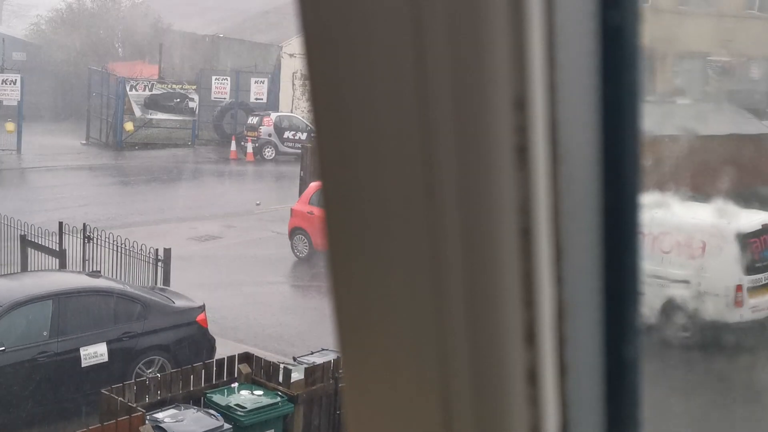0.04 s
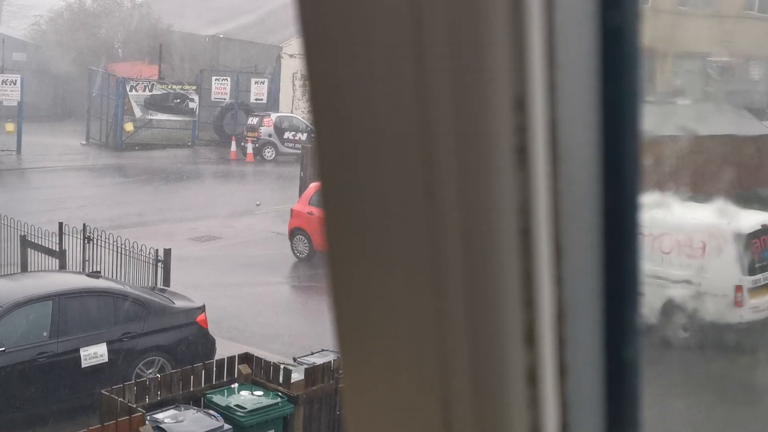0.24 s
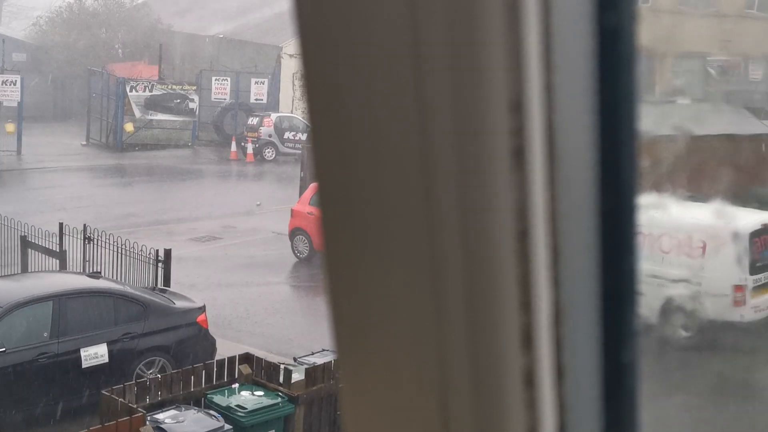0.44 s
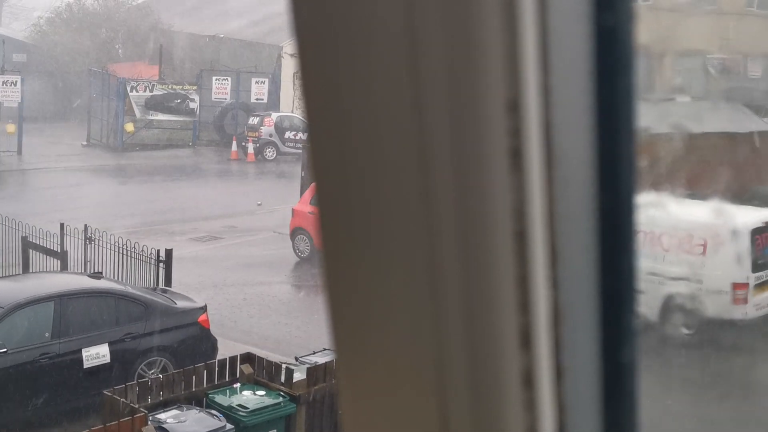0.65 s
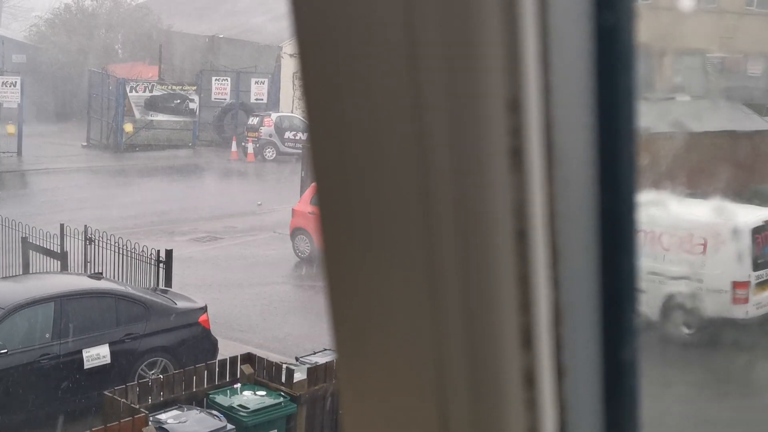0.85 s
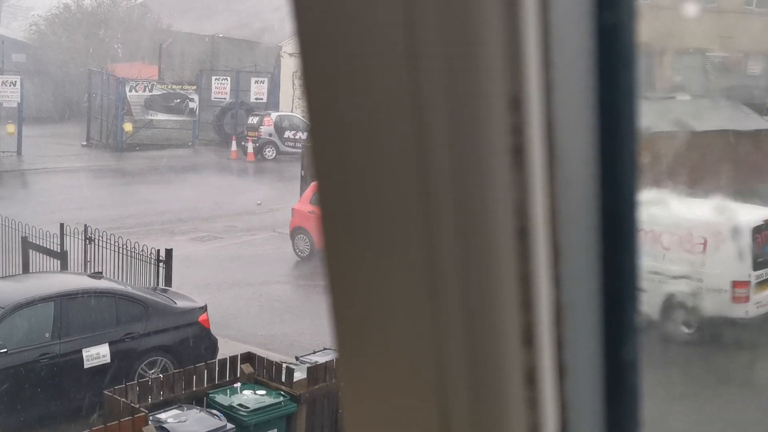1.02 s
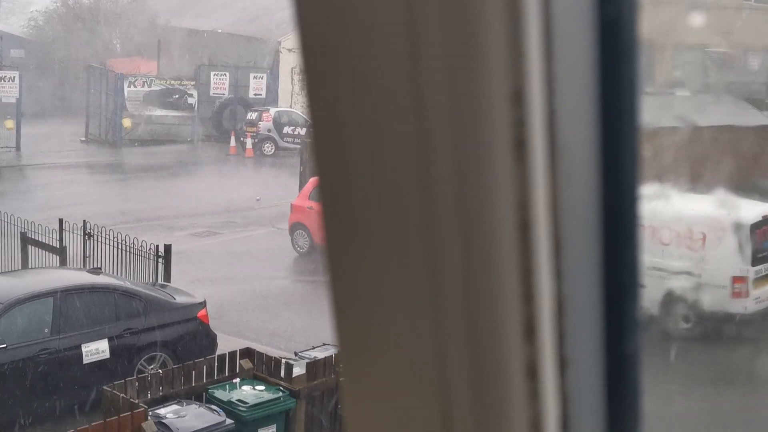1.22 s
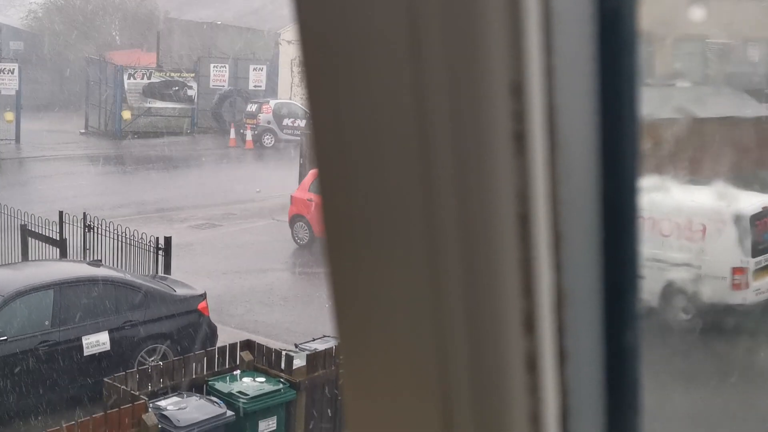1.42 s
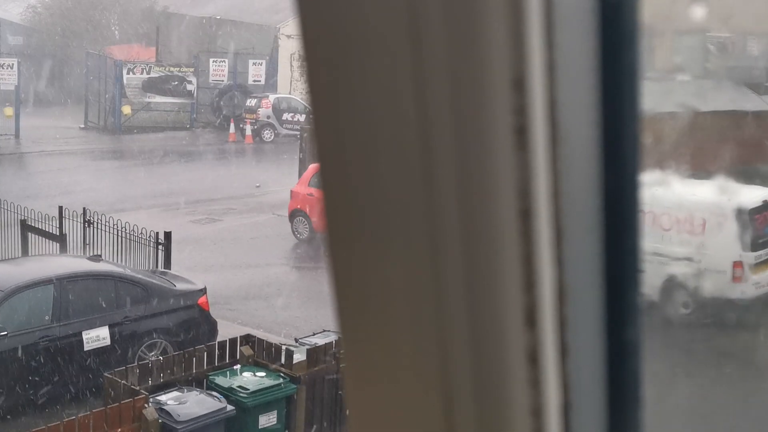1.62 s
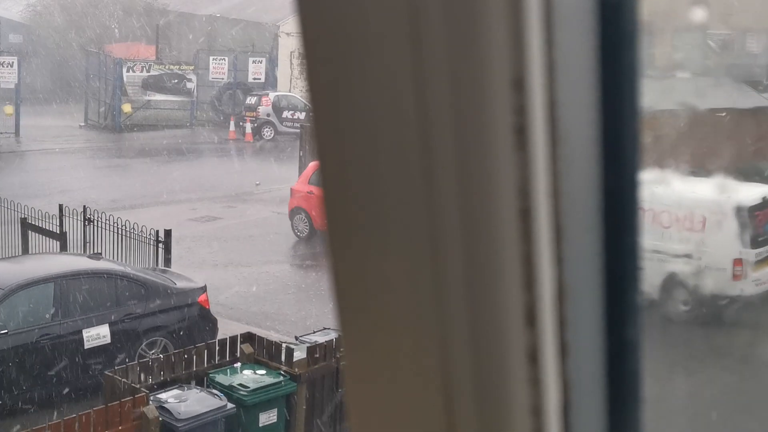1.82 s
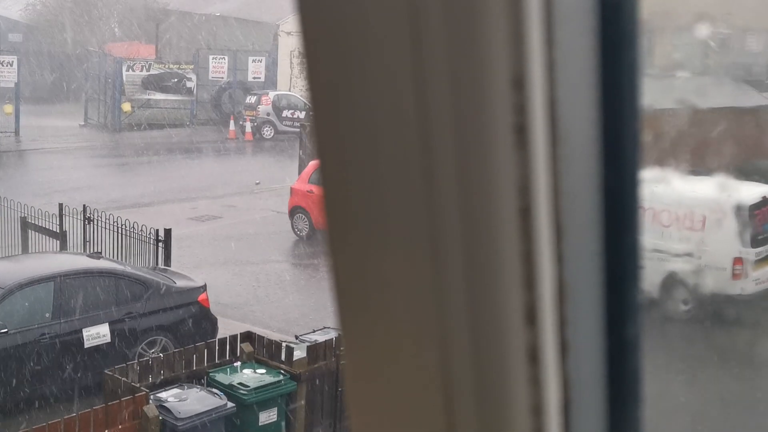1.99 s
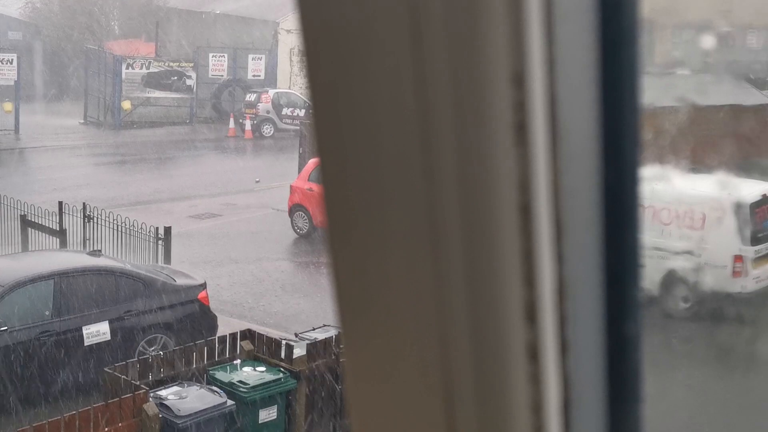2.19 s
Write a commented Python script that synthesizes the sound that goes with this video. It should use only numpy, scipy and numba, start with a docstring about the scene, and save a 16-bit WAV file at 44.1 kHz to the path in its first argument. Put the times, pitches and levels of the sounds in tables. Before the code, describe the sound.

Heavy rain outside a window, with low wind rumble and a few close drips.

```python
"""Heavy wind-driven rain on a street, heard through a slightly open window: countless drop impacts
over a smooth hiss, with a low boom of air in the gap. A gust buffets the phone's left microphone
port with spikes of pressure, so its gain control ducks the rain. As the gust dies, a sheet of rain
splatters on something hard to the right, and a few drops tick close by."""
import sys
import numpy as np
from scipy import signal
from scipy.fft import rfft, irfft
from scipy.io import wavfile
from numba import njit

SR = 44100
rng = np.random.default_rng(int(sys.argv[2]) if len(sys.argv) > 2 else 0)


def wrap_up_sound(samples):
    """Save the sound to the file named by the first command line argument, as 16-bit audio."""
    columns = np.atleast_2d(samples).T
    # keep every value between -1 and 1, then stretch to whole-number steps
    tamed = np.clip(columns, -1, 1)
    steps = np.round(tamed * 32767).astype(np.int16)
    wavfile.write(sys.argv[1], SR, steps)


N = 103635
TIME = np.arange(N) / SR
FREQS = np.arange(N // 2 + 1) * SR / N


def undb(db):
    """Decibels to gain."""
    return 10 ** (np.asarray(db) / 20)


def unit(x):
    """Scale to rms 1."""
    return x / np.sqrt(np.mean(x ** 2))


def fader(points):
    """Gain over time from (t/s, level/dB) points."""
    return undb(np.interp(TIME, *np.array(points).T))


def over_bins(points, column=1):
    """One column of a table, joined on a log-frequency axis."""
    points = np.array(points, float)
    return np.interp(np.log(np.maximum(FREQS, 1)), np.log(points[:, 0]), points[:, column])


def colour(x, points):
    """Equalise by (f/Hz, level/dB) points."""
    return irfft(rfft(x) * undb(over_bins(points)), N)


def wander(hz):
    """Slow random modulation with rms 1."""
    return unit(irfft(rfft(rng.standard_normal(N)) * np.exp(-(FREQS / hz) ** 2), N))


def gap_boom():
    """Wind across the window gap stirs a broad low resonance that swells and sinks, dead centre."""
    # swell of the boom: t/s, level/dB
    swell = [(0, -58), (.6, -55), (1.15, -50.5), (1.34, -51), (1.45, -46), (1.6, -47.5), (1.75, -48),
             (1.88, -53.5), (2.05, -46), (2.15, -51.5), (2.32, -50.5)]
    # resonance of the gap: f/Hz, relative level/dB
    resonance = [(80, -42), (135, -11.5), (172, -0.5), (205, 4), (240, -8), (300, -8), (380, -30),
                 (800, -53)]
    return unit(colour(rng.standard_normal(N), resonance)) * fader(swell)


def near_drips():
    """Drops land close by, each a bright tick that dies in a few milliseconds."""
    # landings: t/s, level before EQ/dB, treble shelf/dB
    landings = [(1.463, -47, 13), (1.9464, -34.5, 2), (2.0865, -43, 12), (2.154, -39.5, -10)]
    # EQ of a tick: f/Hz, level/dB
    tick_eq = [(2000, -17.5), (4500, -14), (5600, -6), (7600, 5), (9000, -23), (15000, -23)]
    decay_s, right_db = .0022, -3
    out = np.zeros((2, N))
    for at, db, shelf_db in landings:
        envelope = 2 * undb(db) * (TIME >= at) * np.exp(-np.abs(TIME - at) / decay_s)
        for side, side_db in enumerate((0, right_db)):
            tick = colour(rng.standard_normal(N) * envelope, tick_eq)
            out[side] += undb(side_db) * colour(tick, [(9000, 0), (14000, shelf_db)])
    return out


def puff(at, width_s):
    """One eddy's rounded spike of pressure."""
    centre, reach = int(at * SR), SR // 50
    near = np.arange(max(centre - reach, 0), min(centre + reach, N))
    out = np.zeros(N)
    out[near] = 1 / np.cosh((TIME[near] - at) / width_s)
    return out


def mic_port(pressure, low_cut_hz=60.8, high_cut_hz=490):
    """The microphone sheds the slowest pressure changes and its port rounds the fastest."""
    low_cut = FREQS ** 2 / np.sqrt(FREQS ** 4 + low_cut_hz ** 4)
    high_cut = 1 / np.sqrt(1 + (FREQS / high_cut_hz) ** 8)
    return irfft(rfft(pressure) * low_cut * high_cut, N)


def eddies():
    """A train of pressure spikes: small eddies are sharper and come in quicker succession."""
    # size of the eddies: t/s, spike width/s
    widths = [(.15, 0.0023), (.27, 0.0017), (.33, 0.0011), (.41, .0012), (.47, 0.00081), (.55, 0.00084),
              (.6, 0.0013), (.65, .00095), (.81, 0.00094), (.86, .0013), (.89, 0.000899), (.95, .0011),
              (.99, 0.00079), (1.04, 0.0019), (1.15, .0014), (1.3, .0026)]
    usual_width_s, usual_rate_hz, scatter_db = .001, 85.93, 2.26
    pressure, at = np.zeros(N), 0.
    for gap_jitter, level_jitter, width_jitter in rng.uniform(-1.7, 1.7, (400, 3)):
        if at * SR >= N:
            break
        width_s = np.interp(at, *np.array(widths).T)
        pressure += undb(scatter_db * level_jitter) * puff(at, width_s * np.exp(.21 * width_jitter))
        at += np.exp(.24 * gap_jitter) * np.sqrt(width_s / usual_width_s) / usual_rate_hz
    return pressure


def wind():
    """A gust batters the left port with eddies and rumble; the right port is sheltered."""
    # wind pressure on the left port: t/s, level/dB
    gust = [(0, -40.5), (.06, -36), (.1, -54), (.15, -45), (.215, -27), (.25, -28.5), (.295, -25),
            (.32, -20), (.42, -19.5), (.47, -25.5), (.55, -22.5), (.585, -29.5), (.632, -18.5),
            (.71, -15.5), (.77, -16.5), (.85, -22.5), (.885, -17), (.945, -28), (.995, -19), (1.025, -38.5),
            (1.045, -27), (1.11, -26), (1.15, -21), (1.18, -37.5), (1.22, -30.5), (1.26, -51), (1.295, -29),
            (1.34, -39.5), (1.4, -34), (1.45, -44), (1.55, -40.5), (1.78, -53), (1.89, -40.5), (1.95, -50),
            (2.08, -42), (2.15, -60), (2.35, -60)]
    # turbulence at a port: f/Hz, relative level/dB
    turbulence = [(15, -21), (35, -9), (50, 1), (72, 0.5), (120, -5), (200, -11), (300, -16), (420, -25.5),
                  (600, -42), (1200, -82)]
    flutter = unit(mic_port(eddies()))
    left_rumble, right_rumble = (unit(colour(rng.standard_normal(N), turbulence)) for _ in range(2))
    exposed = fader(gust) * (undb(-1.5) * flutter + undb(-4.5) * left_rumble)
    sheltered = undb(-59.5) * right_rumble
    return np.array([exposed, sheltered])


def buffets():
    """The hardest eddies thump a port singly."""
    # thumps: t/s, peak ahead of the port/dB, width/s, side (0 left, 1 right)
    thumps = [(0.5227, -14, 0.001, 0), (0.617, -27, 0.0011, 1), (0.7028, -7.5, 0.00048, 0),
              (0.7723, -5, 0.00058, 0), (.813, -3.5, 0.00074, 0), (0.986, -19.5, 0.0016, 0),
              (1.143, -25, 0.0012, 1)]
    pressure = np.zeros((2, N))
    for at, db, width_s, side in thumps:
        pressure[int(side)] += undb(db) * puff(at, width_s)
    return mic_port(pressure)


def patter(drops_per_s=5000, scatter_db=3, drop_share=.37, flicker_db=.61):
    """Countless drop impacts of uneven size over the smooth hiss of far ones; the level flickers."""
    impacts = (rng.random(N) < drops_per_s / SR) * rng.choice([-1, 1], N)
    sizes = undb(scatter_db * np.minimum(rng.exponential(size=N), 5))
    drops = np.sqrt(drop_share) * unit(impacts * sizes)
    hiss = np.sqrt(1 - drop_share) * rng.standard_normal(N)
    return (drops + hiss) * undb(flicker_db * wander(hz=26))


def rain_sheet(left_db=-7.5):
    """The gust throws a sheet of drops on something hard to the right."""
    # envelope of the splatter on the right: t/s, level/dB
    splatter = [(1.1, -86), (1.19, -47), (1.26, -45), (1.32, -46), (1.37, -48.5), (1.46, -65.5)]
    # tone of the hard surface: f/Hz, relative level/dB
    surface = [(1200, -35), (1950, -11), (2270, 4.5), (2700, -4.5), (3000, 0.5), (3300, -24), (3750, -4.5),
               (4300, -12), (5300, -16), (7200, -18), (9000, -32), (15000, -49)]
    left, right = (unit(colour(patter(), surface)) for _ in range(2))
    return np.array([left * undb(left_db), right]) * fader(splatter)


def street_rain(base_db=-43.5, left_lag_s=7e-5):
    """The street's rain, coloured by the window gap: centred in the bass, wide in the treble."""
    # tone of rain through the window: f/Hz, relative left level/dB, relative right level/dB
    tone = [(40, -68, -72.5), (110, -72, -71), (190, -70.5, -72.5), (282, -83, -79), (387, -84.5, -82),
            (456, -75, -75.5), (606, -78, -80), (664, -75, -75.5), (763, -85.5, -82), (808, -76, -78),
            (960, -79, -80), (1560, -83.5, -82), (2170, -86, -80.5), (2360, -84.5, -78.5), (3650, -86, -84),
            (3700, -86, -80.5), (4500, -89, -91.5), (5960, -87.5, -87.5), (7400, -84.5, -86.5),
            (8440, -96, -100), (10130, -106, -108), (15000, -107, -111)]
    # likeness of the rain at the two ports: f/Hz, correlation
    likeness = [(60, 0.82), (180, 1), (650, 1), (900, 0.94), (1400, 0.83), (2100, .34), (3800, 0.31),
                (5400, 0.15), (7000, 0), (15000, -0.18)]
    # how hard the rain falls: t/s, level about the base/dB
    downpour = [(0, 1), (.24, -0.1), (.35, -0.6), (.6, -1.3), (.83, 0), (1.1, 1.2), (1.33, 0.2), (1.45, 0),
                (1.6, -0.05), (1.9, 0), (2.13, -1.06), (2.35, 1.4)]
    correlation = np.clip(over_bins(likeness), -.99, .99)
    mid = rfft(patter()) * np.sqrt(1 + correlation)
    side = rfft(patter()) * np.sqrt(1 - correlation)
    lag = np.exp(-2j * np.pi * FREQS * left_lag_s)
    left = (mid + side) * lag * undb(over_bins(tone, column=1))
    right = (mid - side) * undb(over_bins(tone, column=2))
    return unit(irfft(np.array([left, right]), N)) * undb(base_db) * fader(downpour)


def scene():
    """Rain and wind layers, mixed in stereo."""
    return street_rain() + rain_sheet() + near_drips() + wind() + buffets() + gap_boom()


@njit
def follow_peaks(x, attack_s, release_s):
    """Envelope follower with separate rise and fall times."""
    attack, release = 1 / (attack_s * SR), 1 / (release_s * SR)
    out, level = np.empty(len(x)), 0.
    for i in range(len(x)):
        level += (x[i] - level) * (attack if x[i] > level else release)
        out[i] = level
    return out


def record(dry):
    """One gain control ducks both channels when the wind hits; the top end is cut."""
    threshold_db, slope, high_cut_hz = -22, .41, 15150
    peak = follow_peaks(np.abs(dry).max(axis=0), attack_s=.0088, release_s=.22)
    gain = np.maximum(peak / undb(threshold_db), 1) ** -slope
    high_cut = signal.ellip(10, .2, 70, high_cut_hz, fs=SR, output="sos")
    return signal.sosfilt(high_cut, dry * gain)


dry = scene()
out = record(dry)
wrap_up_sound(out)
```